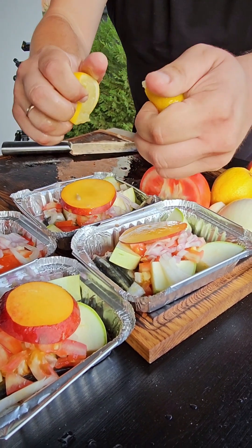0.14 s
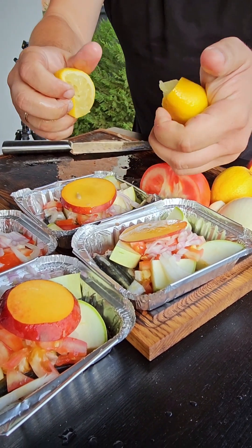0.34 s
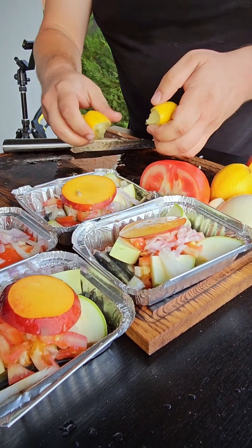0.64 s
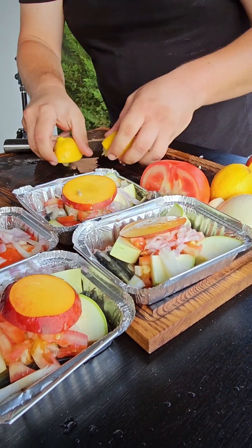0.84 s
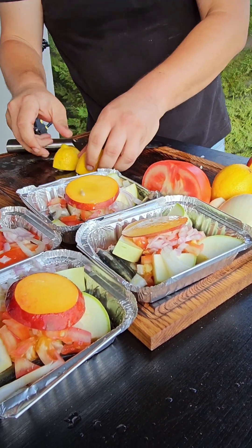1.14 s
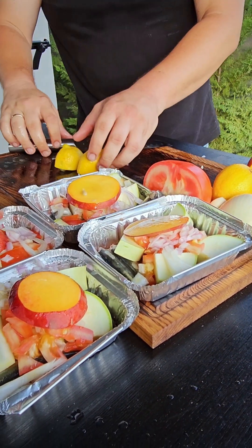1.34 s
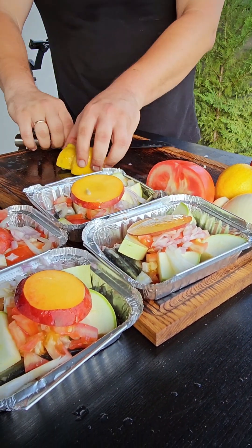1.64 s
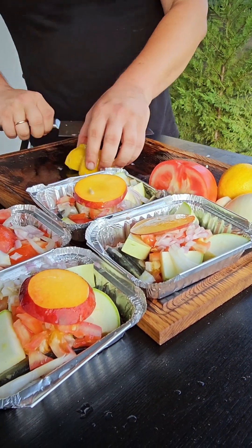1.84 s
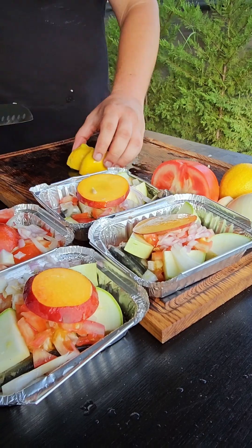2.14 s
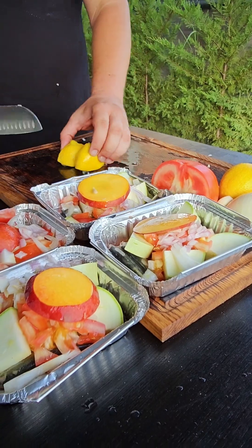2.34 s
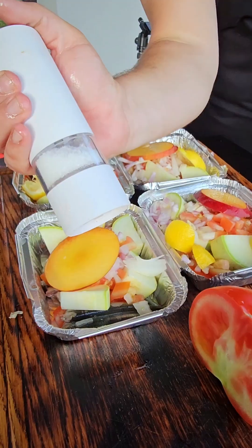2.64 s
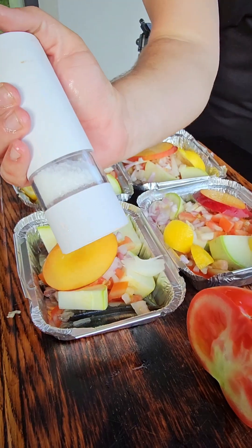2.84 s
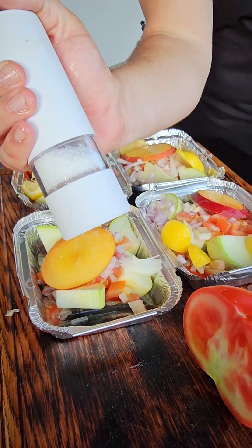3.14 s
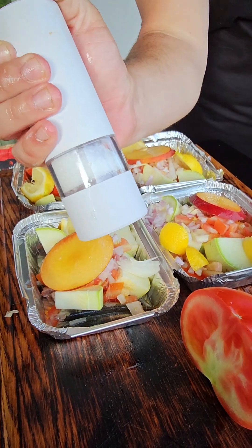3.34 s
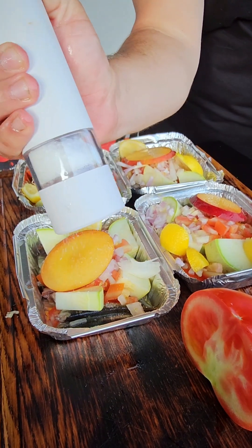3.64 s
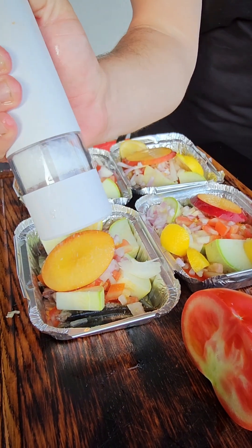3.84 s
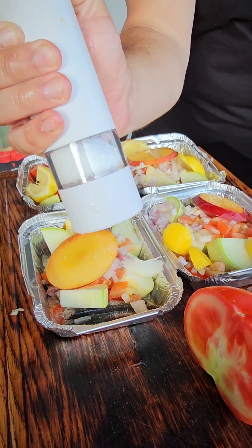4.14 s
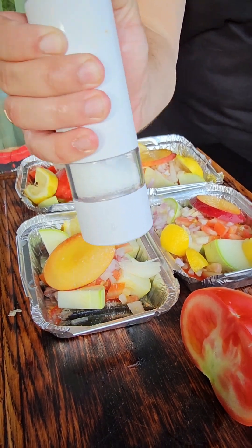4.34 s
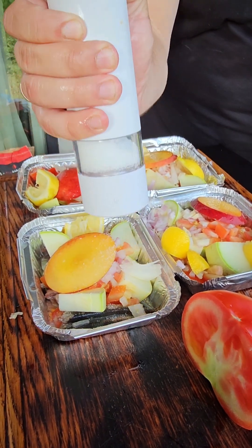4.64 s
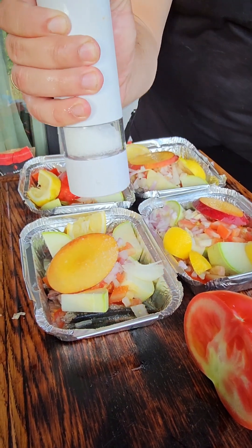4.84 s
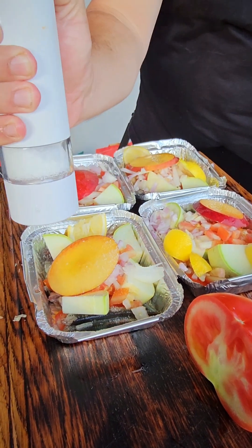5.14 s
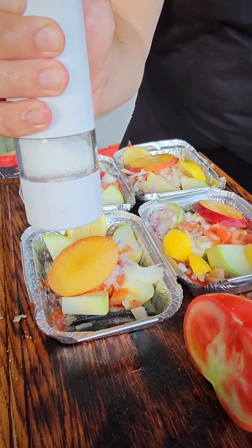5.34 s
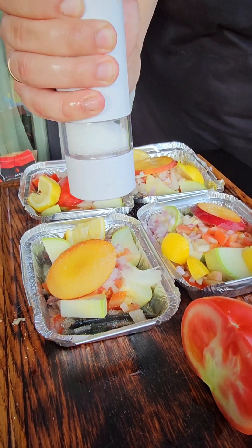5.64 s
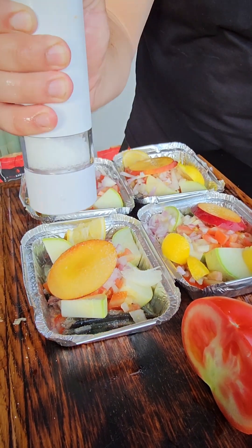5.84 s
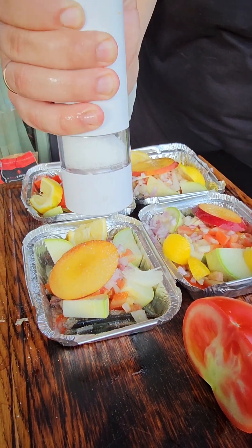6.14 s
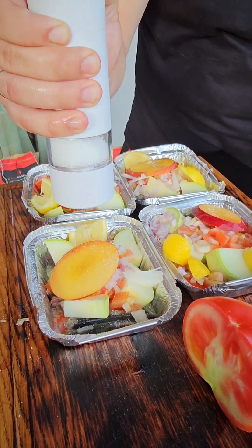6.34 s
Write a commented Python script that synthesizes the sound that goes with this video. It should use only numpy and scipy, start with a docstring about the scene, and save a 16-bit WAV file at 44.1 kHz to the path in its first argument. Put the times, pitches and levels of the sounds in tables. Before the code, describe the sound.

Lemon halves are squeezed and bumped on a wooden board outdoors, then an electric salt mill whines and crunches up close.

```python
"""Outdoors, a machine droning far off. Hands squeeze lemon halves, which smack and fizz, slide and bump
them on a wooden board, and set a knife about. At 2.7 s the sound cuts out for a moment.
Then a battery salt mill starts close to the microphone: its shaft spins up and whines in a gear hiss,
while crystals crack between the burrs and hard ones drag the speed down. At 4.4 s the slanted mill
comes upright, burrs facing the microphone, and its colour changes."""
import sys
import numpy as np
from scipy import signal
from scipy.fft import rfft, irfft
from scipy.io import wavfile
from scipy.ndimage import uniform_filter1d

SR = 44100
rng = np.random.default_rng(int(sys.argv[2]) if len(sys.argv) > 2 else 0)


def master(y):
    """Save y as 16-bit WAV."""
    cut = np.clip(np.atleast_2d(y).T, -1, 1)
    pcm = np.round(cut * 32767)  # scale
    wavfile.write(sys.argv[1], SR, pcm.astype(np.int16))


N = 286209
T = np.arange(N) / SR

# the mill at close range: (time [s], gear hiss [dB], crystal feed [dB])
MILL_LEVELS = [(2.87, -56, -50), (2.89, -32.5, -46), (2.94, -32.5, -35.5), (3.5, -30.5, -34.5),
               (3.95, -30.5, -30.5), (4.56, -26.5, -35.5), (5.13, -29, -32.5), (5.26, -29.5, -28.5),
               (5.77, -25, -36), (5.83, -28, -36.5), (6.33, -26, -31), (6.49, -27, -36)]
# how it is held to the microphone: (time [s], tilt [0 slanted - 1 upright])
MILL_TILT = [(2.87, 0.42), (3.6, 0.068), (3.7, .02), (4.4, 0.024), (4.45, 1), (5.0, 0.81), (5.7, 0.77),
             (6.49, 0.82)]
# colour of breaking salt: (frequency [Hz], slanted gain [dB], upright gain [dB])
CRYSTAL_COLOUR = [(200, -52, -19), (1510, -17, -11), (2500, -9, -4), (3300, -4, 2), (5400, -4.5, -2),
                  (5960, 0.5, -3), (7530, 1.5, -6), (7800, -5.5, -7.5), (9900, -3.5, -3.5),
                  (13700, 0.5, -6.5), (16000, -17, -1)]
# large crystals: (time [s], peak before that colour [dB], treble tilt [dB per octave])
LARGE_CRACKS = [(2.943, -18, -6), (3.0092, -12, -12), (3.1317, -13, -11), (3.1559, -19, -14),
                (3.1873, -17, 7), (3.208, -14, 2), (3.295, -12, 2), (3.349, -12, -2), (3.4766, -7.5, 13),
                (3.5063, -17, 0), (3.6605, -10.5, -3), (3.772, -10.5, -5), (3.8482, -5.5, -6.5),
                (3.9083, -7, -1), (4.0021, -27, 0), (4.041, -17, -9), (4.064, -6, -1), (4.224, -4.5, -0.5),
                (4.2777, -14, 3), (4.3424, -12, -2), (4.3833, -7, -4), (4.4072, -7.5, -5.5),
                (4.4508, -18, -0.5), (4.5716, -1.5, 7), (4.859, -11.5, 0), (4.892, -12, 1),
                (4.932, -7, -1.5), (4.9892, -12, 2), (5.1584, -7, 0.5), (5.2157, -16, 8), (5.2398, -8, 0),
                (5.2473, -5, 0), (5.2686, -32, -2), (5.303, -10.5, -3), (5.311, -9, 4), (5.34, -15, 9),
                (5.3755, -20, 7), (5.5301, -8, 1), (5.5974, -11, -8), (5.7031, -11, 9), (5.7807, -8.5, 2),
                (5.8456, -8.5, 0), (6.063, -13, -3), (6.1092, -1, 2.5), (6.247, -7.5, -3.5)]
# gear hiss, mill slanted: (frequency [Hz], relative level [dB])
GEARS_SLANTED = [(70, -32), (250, -25.5), (480, -21.5), (620, -9.5), (1000, -11), (1900, -13.5),
                 (4300, -14), (8200, -19), (9500, -12), (15800, -7.5)]
# gear hiss, burrs facing the microphone: (frequency [Hz], relative level [dB])
GEARS_UPRIGHT = [(70, -66), (250, -26), (480, -23.5), (620, -9.5), (1000, -12.5), (1900, -15),
                 (4300, -17.5), (7900, -10), (9000, -6), (15800, -9)]
# plastic housing: (frequency [Hz], width [Hz], slanted lift [dB], upright lift [dB])
HOUSING_RESONANCES = [(1530, 220, 3.5, 2.5), (2220, 240, 5.5, 8.5), (2800, 640, 8, 6.5),
                      (3650, 580, 0.5, 10), (4820, 120, 0.5, 5), (6120, 530, 7.5, -2), (7250, 600, 8.5, -4),
                      (10660, 560, -2, 5.5), (11300, 400, -0.5, 1.5), (14200, 1100, -5.5, 5)]
# whine of shaft and teeth: (order [cycles per turn], spinning up [dB], slanted [dB], upright [dB])
SHAFT_ORDERS = [(1, -72.5, -62, -64), (2, -77, -61.5, -62.5), (3, -44.5, -45.5, -46),
                (4, -70, -50.5, -51.5), (5, -67, -53, -53.5), (6, -60, -53, -52), (7, -45.5, -57, -57.5),
                (13, -52, -57, -50.5), (14, -50, -51.5, -54)]
# swell of the main order: (time [s], gain [dB])
MAIN_SWELL = [(2.87, -2), (2.95, -1.5), (3.15, 3.5), (3.4, 0.5), (3.7, 2), (4.0, -0.5), (4.3, 0.5),
              (4.6, -1.5), (5.2, -3.5), (5.7, 2.5), (6.0, -0.5), (6.49, -3.5)]
# hard crystals jam the burrs: (time [s], scale of the speed dip [turns per s])
BURR_JAMS = [(3.28, 1.96), (3.66, 14), (4.06, 5.87), (4.161, 8.2), (4.51, 6), (4.72, 6), (5.17, 7.9),
             (5.26, 6.06), (5.47, 8.9), (5.7, 3.02), (6.03, 10.6), (6.33, 9)]
# hands and peel slide on wood: (fastest at [s], level [dB], hold [s], rise [dB per s], fall [dB per s])
SLIDE_STROKES = [(0.17, -54, .01, 130, 120), (0.533, -64, .005, 600, 150), (0.845, -55.5, .15, 220, 120),
                 (1.07, -42.5, .04, 400, 300), (1.143, -34.5, 0.044, 166, 380), (1.282, -36, .08, 172, 320),
                 (1.366, -32, 0.035, 100, 298), (1.58, -56, .02, 60, 300), (1.616, -41, 0.0043, 600, 178),
                 (1.86, -56, .005, 1300, 400), (1.967, -56, .005, 160, 340), (2.22, -43.5, .02, 270, 140),
                 (2.391, -41.5, 0.035, 76, 181), (2.659, -49.5, 0.034, 1800, 3004)]
# colour of that rubbing: (frequency [Hz], relative level [dB])
PEEL_COLOUR = [(180, -39.5), (300, 9.5), (462, -9.5), (622, -3), (688, -1), (1010, -3), (1770, 0.5),
               (2590, -3.5), (2910, -1.5), (15000, -10.5), (15800, -4.5)]
# squeezed fruit: (time [s], peak [dB], centre [Hz], treble gain [dB])
WET_SMACKS = [(.012, -44, 5800, -19), (0.0848, -33, 2500, -26), (.147, -36, 3000, -12),
              (.1535, -34, 9000, 2), (.18, -33, 9000, 7), (0.21, -35.5, 4000, -7), (0.32, -43.5, 3000, -35),
              (.358, -36.5, 9500, 2), (.432, -46, 10000, 0), (.532, -46, 4470, -26), (.945, -29, 4570, -62),
              (0.966, -38, 2000, -33), (1.455, -40, 8000, -3), (1.576, -51, 3450, -35),
              (1.925, -43, 9000, -1), (2.14, -40, 9250, -5)]
# blows on the board: (time [s], peak [dB], hardness [0-1], damping [0 free - 1 held])
BOARD_THUMPS = [(1.147, -30, 0.27, 0.14), (1.27, -41.5, 0.14, 0.26), (1.44, -46, 0.1, 0.94),
                (1.619, -31.5, 0.98, 0.26), (1.659, -38.5, 0.66, 0.42), (1.71, -43, 0.5, 0.19),
                (1.865, -41.5, 1, 0.19), (1.937, -35.5, 0, 0.89), (1.963, -37, 0.32, 0.26),
                (2.241, -45.5, 0.03, 0.24), (2.429, -44.5, .05, 0.5), (2.657, -43.5, 0.4, 0.3)]
# wooden board: (frequency [Hz], relative level [dB], base t60 [s])
BOARD_MODES = [(167.3, -6, 0.2), (196, -3, 0.085), (247.7, -2, 0.23), (283, 1, 0.13), (375, 0.5, 0.14),
               (431, 0, 0.18), (531, -6.5, 0.3), (612, -1.5, 0.27), (693, 1.5, 0.23), (814, 6, 0.1)]
# knocks of the knife: (time [s], peak [dB], damping [0 free - 1 held], treble tilt [dB per octave])
KNIFE_KNOCKS = [(1.61, -32, 0.26, -4), (1.6191, -20.5, 0.38, -1), (1.629, -27, .45, -13),
                (1.654, -37, .5, -16), (1.861, -26.5, .65, -4), (1.871, -42, 0.39, 10),
                (1.9624, -35, 1, 8.5), (1.978, -46, .3, 4), (1.996, -47, .3, 7), (2.007, -51, .2, 3)]
# knife: (frequency [Hz], relative level [dB], base t60 [s])
KNIFE_MODES = [(1242, -3, 0.2), (1354, 9.5, 0.057), (1400, 6, 0.087), (1770, -5, 0.19), (1945, 7, 0.085),
               (2034, 1, 0.12), (2400, -16, 0.33), (2760, -8.5, 0.13), (3980, -40, 0.55), (4830, -28, 0.64),
               (5100, -25, 0.31), (5800, -30, 0.17)]
# lines of the far machine: (frequency [Hz], width of the waver [Hz])
DRONE_LINES = [(44.5, 1.4), (91, 4.7), (136, 5.54), (631, 5.7)]
# they swell and fade: (time [s], 45 Hz line [dB], 91 Hz line [dB], 136 Hz line [dB], 631 Hz line [dB])
DRONE_SWELLS = [(0, -72, -65, -74, -59), (.27, -70, -71, -71, -86), (.45, -68, -66, -70.5, -69),
                (.7, -68, -69, -72.5, -79), (1.15, -65, -61.5, -68.5, -65), (1.5, -64, -64, -70, -64.5),
                (1.68, -59, -74, -69, -56), (1.8, -64, -79, -68, -78), (2.0, -85, -65, -70, -71),
                (2.45, -74, -56.5, -65, -67), (2.75, -90, -72, -77, -79), (3.5, -80, -65.5, -70, -95),
                (4.5, -74, -63.5, -69, -117), (4.8, -81, -74.5, -81, -95), (5.9, -81, -74, -73, -95),
                (6.1, -90, -86, -79, -95), (6.49, -84, -82, -78, -95)]
# outdoor air: (time [s], level [dB])
AIR_LEVELS = [(0.0, -56), (0.25, -58), (.56, -59), (.72, -64.5), (0.84, -57), (0.95, -53.5), (1.09, -63),
              (1.15, -47.5), (1.35, -81), (1.62, -66), (1.8, -62), (1.9, -55), (2.05, -58.5), (2.36, -64),
              (2.45, -57.5), (2.68, -68), (2.86, -69.5), (3.5, -55), (3.85, -61), (4.76, -53.5),
              (5.49, -47.5), (6.07, -59), (6.2, -56), (6.49, -58)]
# its colour: (frequency [Hz], relative level [dB])
AIR_COLOUR = [(15, -48), (25, -14), (113, -12.5), (194, -12.5), (300, -6), (420, -16), (587, -10.5),
              (769, -7), (1010, -8), (1730, -6.5), (2520, -18), (4100, -16.5), (7630, -33.5), (15800, -24)]
# microphone hiss: (frequency [Hz], relative level [dB]), then its overall level
SELF_NOISE, SELF_NOISE_DB = [(3000, -29), (8000, -13), (12500, -11), (13300, -3), (15500, 10)], -68

SWITCH_ON_S, WHINE_RISE_S, SETTLE_S = 2.87, 0.099, 0.38
START_HZ, FREE_HZ, SPIN_UP_S = 158, 224.7, .065  # shaft turns per s
CREEP_SHARE, CREEP_S = .33, .42  # part of the spin-up comes slowly
MAIN_ORDER, WANDER_DB = 3, 2.5  # the other orders swell at random
MESH_ORDER, MESH_SLIP = 13, .012  # uneven teeth blur the orders from here up (share of the speed)
TOUCH_DB = -67.5  # fingers resting on the fruit
BRIGHT_AT_DB, BRIGHT_PER_DB = -50.5, 0.24  # treble tilt of a stroke: dB per octave for each dB above
FIZZ_PER_S, FIZZ_UNTIL_S, FIZZ_DB, FIZZ_HZ = 20, .55, -50, 11500
CUT_FROM_S, CUT_TO_S, CUT_FADE_S = 2.686, 2.708, 0.009


def salt_crystals():
    """Salt breaks between the burrs: a fine crunch and single loud cracks, each a snap, then debris."""
    _, feed_db = played(MILL_LEVELS)
    t = np.arange(512) / SR
    splinters = rng.standard_normal((24, 512)) * snap_and_tail(t, 0.0016, tail_db=-11, tail_t60=0.012)
    chance = np.clip(300 * gain_of(6 * drift(27)) / SR, 0, 1)  # crystals enter the gap in bunches
    sizes = gain_of(3.5 * np.minimum(rng.exponential(1, N), 3.6))
    impulses = sizes * (rng.random(N) < chance)
    kind = rng.integers(0, len(splinters), N)
    crunch = sum(signal.oaconvolve(impulses * (kind == k), g)[:N] for k, g in enumerate(splinters))
    breaks = gain_of(feed_db) * evened(crunch)
    envelope = snap_and_tail(t, 0.0024, tail_db=-9, tail_t60=.02) * (1 - np.exp(-t / 0.00039))
    for s, db, tilt_db in LARGE_CRACKS:
        crack = coloured(rng.standard_normal(512) * envelope, [(2000, -tilt_db), (16000, 2 * tilt_db)])
        add(breaks, s, gain_of(db) * crack[:-len(t) // 8] / abs(crack).max())
    hz, slanted, upright = np.transpose(CRYSTAL_COLOUR)
    up = uprightness()
    return (1 - up) * coloured(breaks, np.c_[hz, slanted]) + up * coloured(breaks, np.c_[hz, upright])


def gear_hiss():
    """Gear teeth hiss under a fluttering load."""
    hiss_db, _ = played(MILL_LEVELS)
    return hiss(gear_colour, patchy_db=0.98, flicker_db=1) * gain_of(hiss_db + 1.57 * drift(245))


def gear_colour(hz, t):
    """The angle to the microphone blends two slopes and two sets of housing resonances, in dB."""
    up = uprightness(t)
    lifts = sum((slanted + up * (upright - slanted)) / (1 + (2 * (hz - f) / width) ** 2)
                for f, width, slanted, upright in HOUSING_RESONANCES)
    return read(GEARS_SLANTED, hz) * (1 - up) + read(GEARS_UPRIGHT, hz) * up + lifts


def motor():
    """A whine on multiples of the shaft speed, which trembles under the load."""
    speed = shaft_speed() * (1 + 0.0065 * drift(29.85))
    mesh_speed = speed * (1 + MESH_SLIP * drift(60.3))
    shaft_phase, mesh_phase = 2 * np.pi * np.cumsum([speed, mesh_speed], axis=1) / SR
    up = uprightness()
    on_s = np.maximum(T - SWITCH_ON_S, 0)
    fresh = np.exp(-(on_s / SETTLE_S) ** 2)  # the spin-up tone fades into the steady one
    out = np.zeros(N)
    for order, spin_db, slanted_db, upright_db in SHAFT_ORDERS:
        steady_db = slanted_db + up * (upright_db - slanted_db)
        swell_db = played(MAIN_SWELL)[0] if order == MAIN_ORDER else WANDER_DB * drift(2.7)
        db = steady_db + fresh * (spin_db - steady_db) + swell_db + 1.9 * drift(24)
        phase = mesh_phase if order >= MESH_ORDER else shaft_phase
        out += np.sqrt(2) * gain_of(db) * np.sin(order * phase + order ** 2)
    return out * np.minimum(on_s / WHINE_RISE_S, 1)


def shaft_speed(jam_fall_s=.02, jam_recover_s=.25):
    """Turns per second: the shaft spins up towards its free speed and dips after every jam."""
    on_s = np.maximum(T - SWITCH_ON_S, 0)
    lag = (1 - CREEP_SHARE) * np.exp(-on_s / SPIN_UP_S) + CREEP_SHARE * np.exp(-on_s / CREEP_S)
    speed = FREE_HZ - (FREE_HZ - START_HZ) * lag
    for s, loss in BURR_JAMS:
        after = np.maximum(T - s, 0)
        speed -= loss * (1 - np.exp(-after / jam_fall_s)) * np.exp(-after / jam_recover_s)
    return speed


def uprightness(t=T):
    """The mill's angle: 0 slanted, 1 with the burrs facing the microphone."""
    return np.clip(played(MILL_TILT, t)[0], 0, 1)


def sliding_peel():
    """Hands and peel rub on wood until the cut; a faster stroke is louder and brighter."""
    def rub_colour(hz, t):
        octaves = np.log2(np.maximum(hz, 820) / 6000)  # only the treble tilts
        return read(PEEL_COLOUR, hz) + BRIGHT_PER_DB * (rub_db(t) - BRIGHT_AT_DB) * octaves

    rub = hiss(rub_colour, patchy_db=2, flicker_db=0.4, size=256)
    return gain_of(rub_db(T)) * rub * (T < CUT_FROM_S + CUT_FADE_S)


def rub_db(t):
    """Level of the loudest stroke: each rises, holds and falls."""
    strokes = [db - rise * np.maximum(s - t, 0) - fall * np.maximum(t - s - hold, 0)
               for s, db, hold, rise, fall in SLIDE_STROKES]
    return np.maximum(np.max(strokes, axis=0), TOUCH_DB)


def lemon_juice():
    """The squeezed fruit smacks wetly, and tiny bubbles burst while it is pressed."""
    t = np.arange(2048) / SR
    gaps, sizes = rng.exponential(1, (40, 2)).T
    fizz = [(s, FIZZ_DB + 2.5 * size, FIZZ_HZ, 0)
            for s, size in zip(np.cumsum(gaps) / FIZZ_PER_S, sizes) if s < FIZZ_UNTIL_S]
    envelope = snap_and_tail(t, 0.0025, tail_db=-14, tail_t60=0.023) * (1 - np.exp(-t / 0.00031))
    out = np.zeros(N)
    for s, db, hz, treble_db in WET_SMACKS + fizz:
        band = [(hz / 4, -30), (hz / 1.4, -4), (hz * 0.81, 0), (17000, treble_db)]
        smack = coloured(rng.standard_normal(2048) * envelope, band)
        add(out, s, gain_of(db) * smack[:len(t) // 2] / abs(smack).max())
    return out


def board_thumps():
    """Blows ring the wooden board: duller when soft, shorter when it is held."""
    out = np.zeros(N)
    for s, db, hardness, damping in BOARD_THUMPS:
        thump = ring(BOARD_MODES, 15.6 * (hardness - 1), faster=0.44 + 1.8 * damping, spread=0.017)
        add(out, s, gain_of(db) * thump)
    return out


def knife_knocks():
    """The knife rings at each knock; holding it damps the ring."""
    out = np.zeros(N)
    for s, db, damping, tilt_db in KNIFE_KNOCKS:
        add(out, s, gain_of(db) * ring(KNIFE_MODES, tilt_db, faster=0.9 + 3.1 * damping, spread=0.0124))
    return out


def far_machine():
    """A machine in the distance drones on four lines that waver in level and pitch."""
    out = np.zeros(N)
    for db, (hz, width) in zip(played(DRONE_SWELLS), DRONE_LINES):
        level = np.sqrt(2) * gain_of(db + 3.4 * drift(8.4))
        pitch_hz = hz + width * drift(4.3) / 2
        out += level * np.sin(2 * np.pi * np.cumsum(pitch_hz) / SR)
    return out


def yard_air():
    """A soft, patchy rush of open air behind everything."""
    air = hiss(lambda hz, t: read(AIR_COLOUR, hz), patchy_db=4.2, flicker_db=0.51, size=2048)
    return gain_of(played(AIR_LEVELS)[0]) * air


def ring(modes, tilt_db, faster, spread):
    """Dying sines, peak 1; every blow lands elsewhere, so pitches and levels scatter."""
    t = np.arange(round(.4 * SR)) / SR
    x = np.zeros(len(t))
    for hz, db, t60 in modes:
        lot, shift, phase = rng.uniform(-0.98, 1, 3)
        start_db = db + 5.9 * lot + tilt_db * np.log2(hz / modes[0][0])
        cycles = hz * (1 + spread * shift) * t + 0.2 * phase
        x += gain_of(start_db - 60 * faster * t / t60) * np.sin(2 * np.pi * cycles)
    x *= 1 - np.exp(-t / 0.001)  # soft start
    return x / abs(x).max()


def snap_and_tail(t, t60, tail_db, tail_t60):
    return gain_of(-60 * t / t60) + gain_of(tail_db - 60 * t / tail_t60)


def hiss(colour_db, patchy_db, flicker_db, size=512):
    """Noise of rms 1 from random short-time spectra shaped by colour_db(hz, t)."""
    hop = size // 4
    frames, hz = N // hop + 5, np.fft.rfftfreq(size, 1 / SR)[:, None]
    real, imag, patches = rng.standard_normal((frames, len(hz), 3)).T
    patches = evened(uniform_filter1d(uniform_filter1d(patches, 8, 0), 16, 1))
    shape = gain_of(colour_db(hz, np.arange(frames) * hop / SR) + np.zeros(frames))
    shape /= np.sqrt((shape ** 2).mean(0))
    unevenness = gain_of(patchy_db * patches + flicker_db * rng.standard_normal(frames))
    spectra = (real + 1j * imag) * shape * unevenness
    return evened(signal.istft(spectra, nperseg=size, noverlap=size - hop)[1][:N])


def drift(rate_hz):
    """Slow chance of rms 1."""
    return evened(signal.lfilter(*signal.butter(2, rate_hz, fs=SR), rng.standard_normal(N)))


def coloured(x, points):
    return irfft(rfft(x) * gain_of(read(points, np.fft.rfftfreq(len(x), 1 / SR))), len(x))


def read(points, hz):
    f, value = np.transpose(points)
    return np.interp(np.log(hz + 1), np.log(f + 1), value)


def played(rows, t=T):
    """Columns of a curve table at the times t."""
    s, *columns = np.transpose(rows)
    return [np.interp(t, s, c) for c in columns]


def add(mix, s, sound):
    part = mix[round(s * SR):][:len(sound)]
    part += sound[:len(part)]


def gain_of(db):
    return 10 ** (np.asarray(db) / 20)


def evened(x):
    return x / np.sqrt(np.mean(x ** 2) + 1e-20)


def scene():
    """One microphone outdoors: first the lemons on the board, then the mill up close."""
    background = yard_air() + far_machine()
    hands = sliding_peel() + lemon_juice() + board_thumps() + knife_knocks()
    running = np.clip((T - SWITCH_ON_S) / 0.026, 0, 1)
    mill = running * (motor() + gear_hiss() + salt_crystals())
    return (background + hands + mill)[None]


def record(dry):
    """The microphone hisses; a moment between the scenes is muted; deep bass and top treble are cut."""
    noisy = dry + gain_of(SELF_NOISE_DB) * evened(coloured(rng.standard_normal(N), SELF_NOISE))
    mute = np.clip(np.maximum(CUT_FROM_S - T, T - CUT_TO_S) / CUT_FADE_S, .01, 1)
    low_cut = signal.butter(4, 36, "high", fs=SR, output="sos")
    high_cut = signal.firwin(2047, 15500, window=("kaiser", 8), fs=SR)
    return signal.oaconvolve(signal.sosfilt(low_cut, noisy * mute), high_cut[None], "same")


dry = scene()
out = record(dry)
master(out)
```